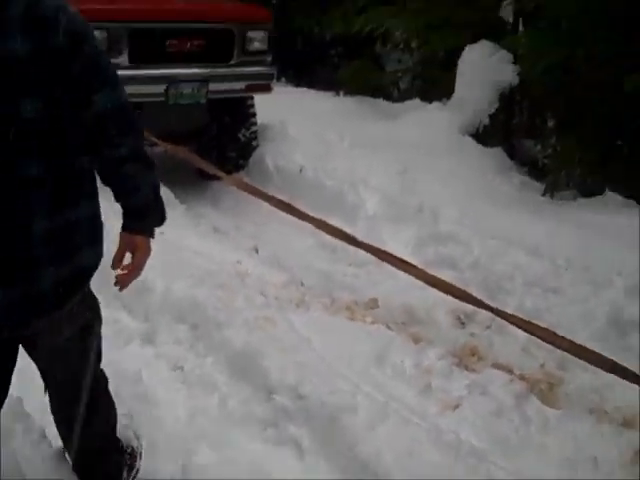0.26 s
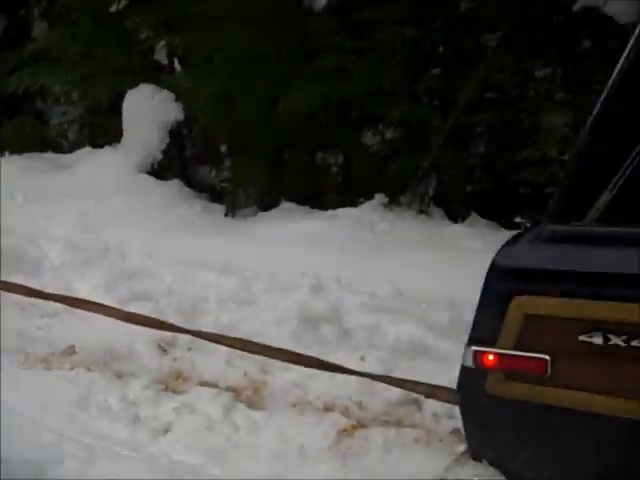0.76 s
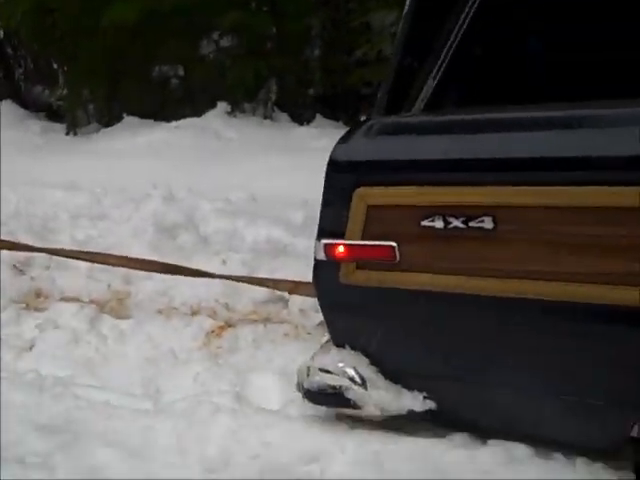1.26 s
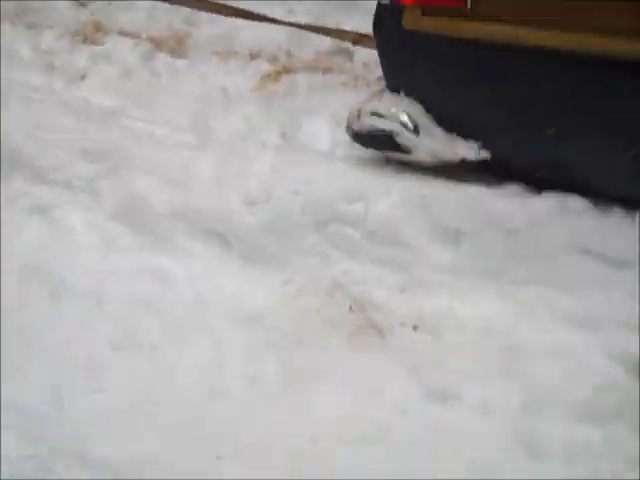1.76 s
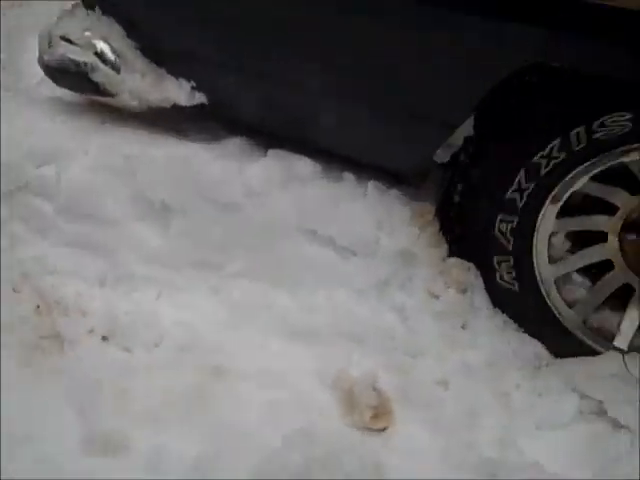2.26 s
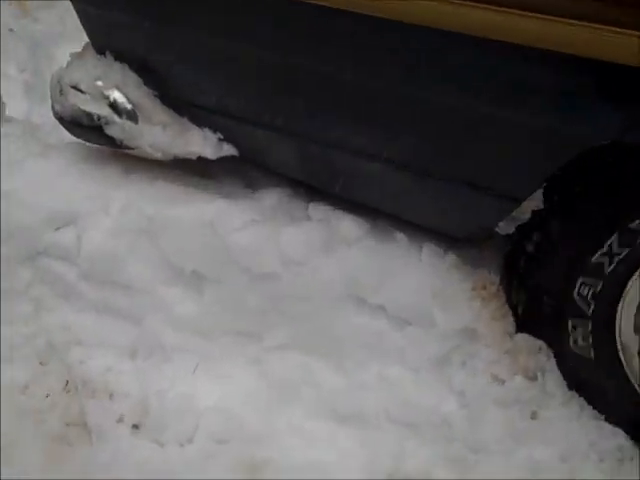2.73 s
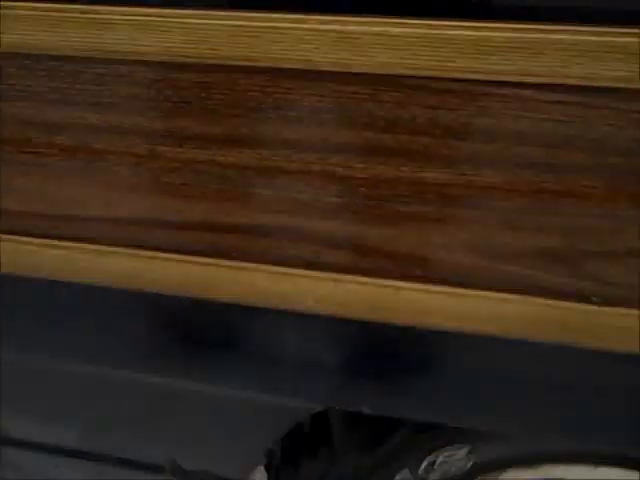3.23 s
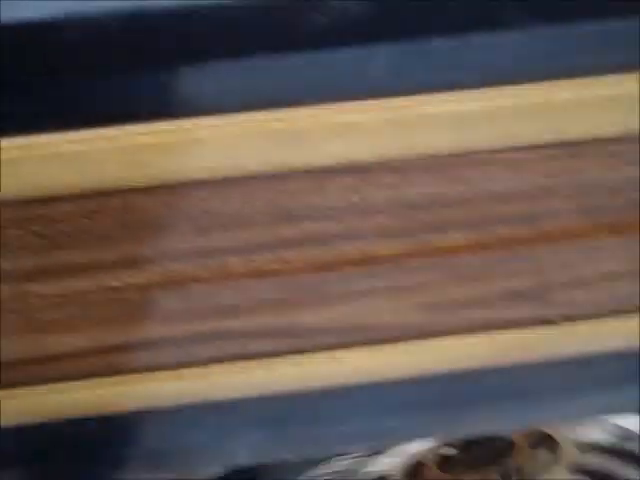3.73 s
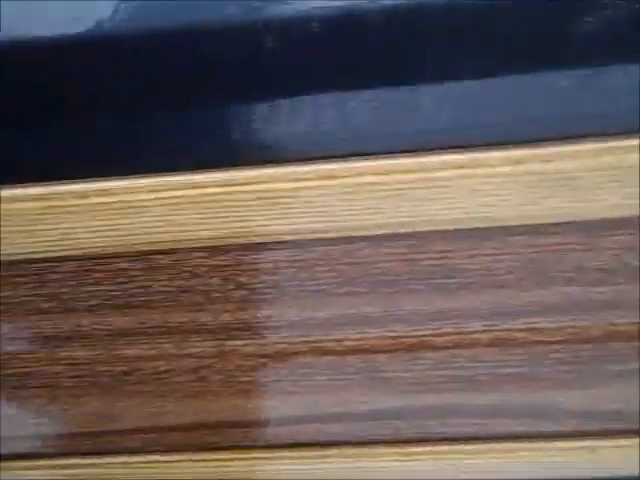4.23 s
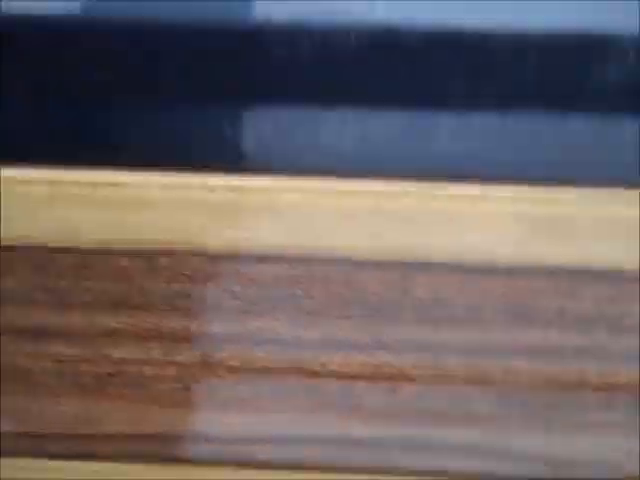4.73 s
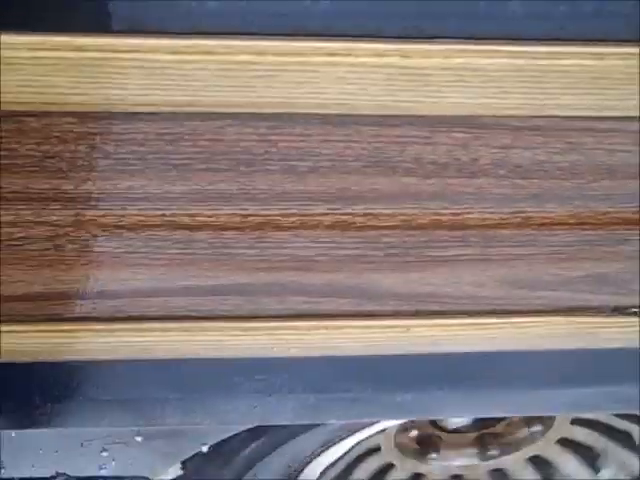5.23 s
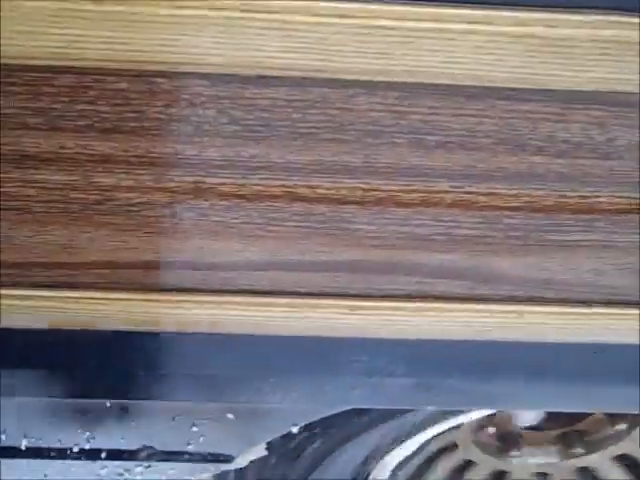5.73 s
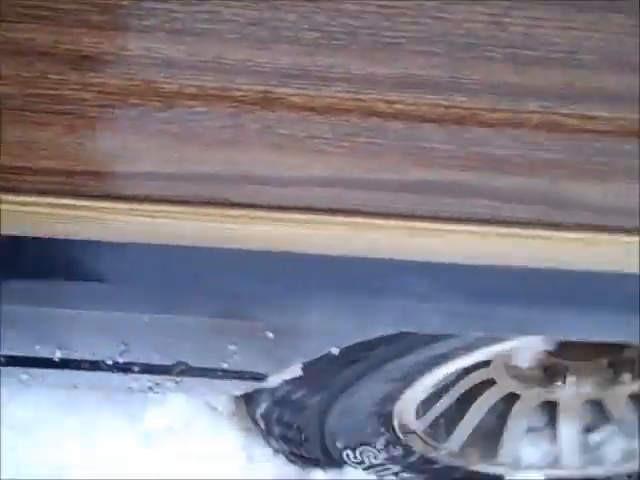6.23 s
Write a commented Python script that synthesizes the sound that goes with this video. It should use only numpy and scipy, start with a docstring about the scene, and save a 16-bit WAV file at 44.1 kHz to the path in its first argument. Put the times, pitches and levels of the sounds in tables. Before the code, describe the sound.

A V8 engine burbles loudly and steadily under load, with a tyre hissing and crunching in snow and the sound dipping abruptly several times.

```python
"""V8 off-roader stuck in snow

The engine strains at about 1250 rpm while the vehicle is towed out, heard from beside its rear wheel.
Uneven firings of the two cylinder banks burble through the muffler, over exhaust rush, engine clatter
and a tyre slipping and crunching in snow. Now and then the whole sound drops abruptly and swells back."""
import sys
import numpy as np
from scipy import signal
from scipy.fft import rfft, irfft, next_fast_len
from scipy.io import wavfile
from scipy.ndimage import uniform_filter1d, minimum_filter1d

SR = 44100
rng = np.random.default_rng(int(sys.argv[2]) if len(sys.argv) > 2 else 0)


def unload_audio(sound):
    """Save the sound as a 16-bit wav file, at the path given as the first command line argument."""
    columns = np.transpose(np.atleast_2d(sound))
    # keep every value between -1 and 1, then stretch to whole-number steps
    steps = np.round(np.clip(columns, -1, 1) * 32767)
    wavfile.write(sys.argv[1], SR, steps.astype(np.int16))


N = 286297
TIME = np.arange(N) / SR


def from_db(db):
    """Decibels to gain."""
    return 10 ** (np.asarray(db) / 20)


def rms_one(x):
    """Scale to unit power."""
    return x / np.sqrt(np.mean(x ** 2) + 1e-20)


def bell(away, spread):
    """A bell-shaped swell that peaks at 1 where away is zero."""
    return np.exp(-.5 * (away / spread) ** 2)


def drift(rate_hz):
    """A random wobble of unit power."""
    knots = rng.standard_normal(1024)
    return rms_one(np.interp(TIME * rate_hz, np.arange(len(knots)), knots))


def colour(x, points, channels=1):
    """Equalise by rows of Hz and dB, with one dB column or one per channel."""
    size = next_fast_len(N + 4096)
    log_hz = np.log(np.maximum(np.arange(size // 2 + 1) * SR / size, 1))
    hz, *columns = np.transpose(points)
    gains = from_db([np.interp(log_hz, np.log(hz), db) for db in columns[:channels]])
    return irfft(rfft(x, size) * gains, size)[..., :N]


def resonate(x, hz, width_hz):
    """One resonance with gain 1 at its peak."""
    r = np.exp(-np.pi * width_hz / SR)
    feedback = [1, -2 * r * np.cos(2 * np.pi * hz / SR), r * r]
    return signal.lfilter(np.array([1, 0, -1]) * (1 - r * r) / 2, feedback, x + 1e-18)


# Stereo image of the noise. Each row: frequency in Hz, left-right likeness from 0 (wide) to 1 (mono).
STEREO_LIKENESS = [(100, 1), (600, 0.8), (1300, 0.65), (2400, 0.49), (3600, 0.03), (5500, 0.55),
                   (8000, 0.04), (14000, 0)]


def stereo_noise(spectrum, grain_db):
    """Noise of uneven grains, centred in the bass and diffuse in the treble."""
    grains = from_db(grain_db * np.repeat(rng.standard_normal(N // 32 + 1), 32)[:N])
    mid, side = rng.standard_normal((2, N)) * grains
    hz, alike = np.transpose(STEREO_LIKENESS)
    alike = np.clip(alike, 0, .999)
    mid = colour(mid, np.c_[hz, 10 * np.log10(1 + alike)])
    side = colour(side, np.c_[hz, 10 * np.log10(1 - alike)])
    return rms_one(colour(mid + side * [[1], [-1]], spectrum))


def each_cycle(cycle, accents):
    """A gain that swells at set places in every engine cycle, never quite equally."""
    power = 1
    for place, spread, db in accents:
        away = (cycle - place + .5) % 1 - .5
        power = power + from_db(db + drift(21.04)) ** 2 * bell(away, spread)
    return rms_one(np.sqrt(power))


# Dull knocks. Each row: start in seconds, level in dB, lowest mode in Hz.
KNOCK_HITS = [(3.686, -29.5, 880), (5.047, -22.5, 640)]
# Their upper modes. Each row: pitch in Hz, width in Hz, gain in dB against the lowest mode.
KNOCK_UPPER_MODES = [(1029.2, 361, -14), (1560, 490, -13)]


def knocks(decay_s, width_hz):
    """Short soft blows ring a few damped modes."""
    soften = signal.butter(4, 1600, fs=SR, output="sos")
    out = 0
    for start, db, low_hz in KNOCK_HITS:
        blow = signal.sosfilt(soften, rng.standard_normal(N))
        modes = [(low_hz, width_hz, 0)] + KNOCK_UPPER_MODES
        ring = sum(from_db(mode_db) * resonate(blow, hz, width) for hz, width, mode_db in modes)
        envelope = (TIME > start) * np.exp(-np.abs(TIME - start) / decay_s)
        out = out + from_db(db) * envelope * rms_one(ring)
    return out


# Squeaks under the rubber. Each row: peak time in seconds, level in dB, pitch in Hz.
SNOW_SQUEAKS = [(1.07, -49, 6044), (1.56, -43.5, 6000), (2.25, -47, 6160), (3.225, -47.5, 5460),
                (4.93, -55, 7220), (5.6, -42, 7293)]


def snow_squeaks(spread_s, width_hz):
    """Packed snow sticks and slips in brief, narrow-band chirps."""
    out = 0
    for peak_s, db, hz in SNOW_SQUEAKS:
        ring = rms_one(resonate(rng.standard_normal(N), hz, width_hz))
        out = out + from_db(db) * bell(TIME - peak_s, spread_s) * ring
    return out


# Bites of the tread. Each row: peak time in seconds, half length in seconds, relative level in dB.
TREAD_BITES = [(2.72, .03, -44), (3.3, .025, -38.5), (3.79, .012, -40), (4.165, .012, -41),
               (4.207, .02, -35), (4.32, .035, -42), (4.563, .014, -39), (4.937, .016, -39),
               (5.365, .008, -42), (5.99, .012, -44), (6.16, .012, -44)]
# Their bright tone. Each row: frequency in Hz, relative level in dB.
CRUNCH_SPECTRUM = [(400, -5), (1200, 1.5), (2800, 2.5), (4000, 1.5), (7000, 2.5), (10000, -0.5),
                   (14000, 2.5)]


def snow_crunches():
    """The tread breaks snow loose in bursts of coarse grains."""
    bursts = sum(from_db(db) * bell(TIME - peak_s, spread_s) for peak_s, spread_s, db in TREAD_BITES)
    return from_db(2) * bursts * stereo_noise(CRUNCH_SPECTRUM, grain_db=4.5)


# Hiss fader as the wheel slips and comes closer. Each row: time in seconds, level in dB.
HISS_LEVEL = [(0, -42.5), (.3, -45.5), (.75, -46), (2.0, -42.5), (2.3, -44.5), (2.8, -42), (3.65, -45),
              (4.2, -41.5), (5.8, -42), (6.49, -43.5)]
# The tone of the hiss. Each row: frequency in Hz, relative level in dB.
HISS_SPECTRUM = [(2000, -30), (3600, -11), (4700, -6.5), (6000, 1), (8000, 0.5), (10000, -8.5), (14000, -2)]
# Its throbs. Each row: place in the engine cycle from 0 to 1, half length in cycles, dB over the hiss.
HISS_ACCENTS = [(.2, 0.013, 3), (.594, 0.031, 1)]


def tyre_hiss(cycle):
    """The tyre slips on snow with a flickering hiss that throbs in time with the engine."""
    level_db = np.interp(TIME, *np.transpose(HISS_LEVEL)) + 1.84 * drift(35)
    return from_db(level_db) * stereo_noise(HISS_SPECTRUM, grain_db=1.5) * each_cycle(cycle, HISS_ACCENTS)


# The tone of the clatter. Each row: frequency in Hz, relative level in dB.
CLATTER_SPECTRUM = [(700, -20), (1200, 0.5), (1800, 2), (2500, -3), (3500, -2), (4500, 0), (7000, -21.5),
                    (14000, -19.5)]
# Valve ticks. Each row: place in the engine cycle from 0 to 1, half length in cycles, dB over the clatter.
VALVE_ACCENTS = [(0.9, 0.0024, 7), (0.726, 0.0035, 8.5)]


def engine_clatter(cycle):
    """Mechanical noise with two sharp ticks of the valve gear in every cycle."""
    return stereo_noise(CLATTER_SPECTRUM, grain_db=-0.6) * each_cycle(cycle, VALVE_ACCENTS)


def rasp(cycle, morph_rad_per_s, size=2048):
    """A ragged pressure shape repeats every cycle and slowly morphs: a comb of engine orders."""
    shapes = rng.standard_normal((2, size))
    first, second = [np.interp(cycle, np.arange(size) / size, shape, period=1) for shape in shapes]
    turn = morph_rad_per_s * TIME
    return rms_one(first * np.cos(turn) + second * np.sin(turn))


# Hollow tones that come and go in the rush.
# Each row: start in seconds, end in seconds, pitch in Hz, width in Hz, level in dB.
HOLLOW_TONES = [(0.08, 1.3, 273, 36, -34.5), (0, 1.2, 330, 70, -38.5), (0, 1.73, 710, 160, -47),
                (1.12, 1.29, 647, 140, -40), (0.5, 1.68, 1840, 680, -53), (2.5, 2.895, 2160, 875, -52.5),
                (1.7, 2.31, 890, 240, -45), (2.5, 2.82, 1050, 200, -46), (3.5, 6.61, 560, 26, -44),
                (4, 6.52, 430, 98, -43), (2.5, 6.51, 2840, 900, -55.5)]


def hollow_tones(cycle, fade_s):
    """Engine orders and air slide through resonances, each heard for part of the way along the body."""
    drive = rasp(cycle, morph_rad_per_s=1.176) + rng.standard_normal(N)
    out = 0
    for start, end, hz, width, db in HOLLOW_TONES:
        fade = np.clip(np.minimum(TIME - start, end - TIME) / fade_s + .5, 0, 1)
        ring = resonate(resonate(drive, hz, width), hz, width)
        out = out + from_db(db) * fade * rms_one(ring)
    return out


# The breathy midrange of the tailpipe. Each row: frequency in Hz, relative level in dB.
RUSH_SPECTRUM = [(150, -9.5), (240, 6), (330, -0.5), (480, 0), (650, -3.5), (850, -3), (1000, -9.5),
                 (1200, -19.5), (1800, -31)]


def exhaust_rush(pressure, cycle, rasp_db, puff_db, flutter_db):
    """Gas leaves the tailpipe in puffs that follow the pressure, part rasp and part turbulence."""
    per_cycle = rasp(cycle, morph_rad_per_s=1.494)
    per_firing_pair = rasp(4 * cycle, morph_rad_per_s=5)
    orders = from_db(rasp_db) * rms_one(colour(per_cycle + 2 * per_firing_pair, RUSH_SPECTRUM))
    turbulence = stereo_noise(RUSH_SPECTRUM, grain_db=2.5) * from_db(flutter_db * drift(110))
    return rms_one((orders + turbulence) * from_db(puff_db * pressure))


# The low end of the exhaust noise. Each row: frequency in Hz, relative level in dB.
RUMBLE_SPECTRUM = [(15, -16), (32, 3), (48, 7.5), (66, -6.5), (110, 8), (170, -3.5), (220, -5), (300, -33),
                   (500, -53)]


def exhaust_rumble():
    """A bed of rough bass noise under the exhaust note."""
    return stereo_noise(RUMBLE_SPECTRUM, grain_db=4)


# The lope of the V8. Each entry: one cylinder's relative strength in dB, in firing order.
CYLINDER_STRENGTH_DB = [4.5, 2.5, -1.5, 3.5, 5, 0.24, 5, -2]
# The two banks, in the same order. Each entry: 1 for a far-bank cylinder, 0 for a near one.
ON_FAR_BANK = [0, 0, 1, 0, 1, 1, 0, 1]
FAR_BANK_LAG_S, FIRING_OFFSET_CYCLES = 0.0022, -0.03


def firings(cycle, uneven_db, jitter_s):
    """One pressure pulse per cylinder, eight to a cycle of two crank turns."""
    number = np.arange(1, 640)
    cylinder = number % 8
    timing_scatter, level_scatter = rng.standard_normal((len(number), 2)).T
    fired_s = np.interp(number / 8 + FIRING_OFFSET_CYCLES, cycle, TIME, right=2 * TIME[-1])
    # the far bank has the longer pipe, so its pulses arrive late
    arrival_s = fired_s + FAR_BANK_LAG_S * np.array(ON_FAR_BANK)[cylinder] + jitter_s * timing_scatter
    strength = from_db(np.array(CYLINDER_STRENGTH_DB)[cylinder] + uneven_db * level_scatter)
    return np.bincount(np.abs(arrival_s * SR).astype(int), strength, N)[:N]


# Resonances of the pipe and muffler. Each row: pitch in Hz, width in Hz, relative level in dB.
PIPE_MODES = [(53.6, 12.9, -7), (79.5, 23.3, -8.5), (109.8, 19.1, -1), (134.76, 21.1, -5),
              (156.1, 14.14, 0), (202.7, 37, -17.5)]


def exhaust_note(pulses, cycle, muffler_hz, low_cut_hz):
    """The firing pulses ring the pipe, and the muffler lets only the bass out."""
    first_cycle = pulses[cycle < 1]
    pulses = np.r_[first_cycle, first_cycle, pulses]  # pre-roll, so the pipe is already ringing
    ring = sum((-1) ** (k + 1) * from_db(db) * resonate(pulses, hz, width)
               for k, (hz, width, db) in enumerate(PIPE_MODES))
    muffled = signal.sosfilt(signal.butter(8, muffler_hz, fs=SR, output="sos"), ring)
    note = signal.sosfilt(signal.butter(1, low_cut_hz, "high", fs=SR, output="sos"), muffled)
    return rms_one(note[-N:])


def draw_alongside(note, thin_db, alongside_s):
    """The note's deepest bass starts thin and fills in as the vehicle comes alongside."""
    deep = colour(note, [(88, 0), (106, -40)])
    deep_gain = from_db(thin_db * np.clip(1 - TIME / alongside_s, 0, 1))
    return note + (deep_gain - 1) * deep


# The wavering revs. Each row: time in seconds, engine speed in rpm.
ENGINE_SPEED = [(0.0, 1307.4), (0.19, 1265), (0.52, 1240), (1.06, 1273), (1.25, 1219), (1.57, 1204),
                (1.83, 1278), (2.3, 1267.0), (2.35, 1302), (2.82, 1232), (2.93, 1216), (3.96, 1275),
                (4.24, 1283), (5.28, 1271), (5.6, 1215), (5.76, 1274), (6.1, 1270), (6.49, 1236)]
# The engine's mix at working speed; all four layers grow a little louder as it revs.
NOTE_DB, RUMBLE_DB, RUSH_DB, CLATTER_DB = -11, -24, -34.5, -44
WORKING_RPM, LOUDER_DB_PER_RPM = 1260, .011
# As the vehicle is drawn past, the rush gains and the clatter fades.
RUSH_GAIN_DB_PER_S, CLATTER_FADE_DB_PER_S = 0.2554, 0.77


def scene():
    """Exhaust, engine and tyre, all close by in the open air."""
    rpm = np.interp(TIME, *np.transpose(ENGINE_SPEED))
    cycle = np.cumsum(rpm) / (120 * SR)  # engine cycles so far, two crank turns each
    effort_db = LOUDER_DB_PER_RPM * (rpm - WORKING_RPM)
    rush_db = RUSH_DB + effort_db + RUSH_GAIN_DB_PER_S * TIME
    clatter_db = CLATTER_DB + effort_db - CLATTER_FADE_DB_PER_S * TIME
    pulses = firings(cycle, uneven_db=.7, jitter_s=.00012)
    note = exhaust_note(pulses, cycle, muffler_hz=175, low_cut_hz=22)
    burble = from_db(NOTE_DB) * draw_alongside(note, thin_db=-4, alongside_s=2.4)
    exhaust = from_db(effort_db) * (burble + from_db(RUMBLE_DB) * exhaust_rumble())
    rush = from_db(rush_db) * exhaust_rush(note, cycle, rasp_db=5, puff_db=1.8, flutter_db=2.6)
    hollows = hollow_tones(cycle, fade_s=.2)
    clatter = from_db(clatter_db) * engine_clatter(cycle)
    snow = tyre_hiss(cycle) + snow_crunches() + snow_squeaks(spread_s=.005, width_hz=600)
    return exhaust + rush + hollows + clatter + snow + knocks(decay_s=.013, width_hz=110)


# Sudden ducks of the whole mix. Each row: start in seconds, depth in dB.
LEVEL_DIPS = [(0.175, 6.5), (0.647, 5), (1.316, 4.5), (1.619, 10), (2.286, 11.5), (2.85, 4.5), (3.049, 12),
              (3.723, 7), (4.568, 7), (4.759, 5.5), (4.951, 14.5), (6.185, 7.5), (6.47, 8)]


def level_dips(fall_s, hold_s, recovery_db_per_s, opening_db):
    """The level falls within milliseconds, stays down briefly and climbs back evenly in dB."""
    # the opening is a little louder, and the first dip takes that away for good
    gain_db = opening_db * np.clip((LEVEL_DIPS[0][0] - TIME) / fall_s + .5, 0, 1)
    for start, depth_db in LEVEL_DIPS:
        fall = np.clip((TIME - start) / fall_s + .5, 0, 1)
        recovered_db = recovery_db_per_s * np.maximum(TIME - start - hold_s, 0)
        gain_db = gain_db - fall * np.maximum(depth_db - recovered_db, 0)
    return from_db(gain_db)


def limiter(x, ceiling, size=882):
    """The gain gives way smoothly around any peak that would overload."""
    safe_gain = np.minimum(1, ceiling / (np.abs(x).max(axis=0) + 1e-9))
    return x * uniform_filter1d(minimum_filter1d(safe_gain, size), size)


# Bass roll-off of the microphone capsules. Each entry: corner in Hz, left then right.
CAPSULE_LOW_CUT_HZ = [82.7, 27.8]
# Resonances of the microphone ports. Each row: frequency in Hz, left gain in dB, right gain in dB.
PORT_EQ = [(300, 0.23, -0.22), (4440, 0, 0), (5140, 3.5, 5.5), (5920, 3.5, 9), (6780, 8.5, 2),
           (7370, 11, -7.5), (8090, 3.5, -7.5), (9530, 0.5, -9), (13900, -9, -24)]
TOP_CUT_HZ = 14300


def record(dry):
    """The microphone thins the bass and colours the treble; then level dips, a limiter and a top cut."""
    thinned = [signal.lfilter(*signal.butter(1, hz, "high", fs=SR), side)
               for hz, side in zip(CAPSULE_LOW_CUT_HZ, dry)]
    coloured = colour(np.array(thinned), PORT_EQ, channels=2)
    ducked = coloured * level_dips(fall_s=.006, hold_s=.051, recovery_db_per_s=54, opening_db=1.7)
    top_cut = signal.ellip(12, .1, 90, TOP_CUT_HZ, fs=SR, output="sos")
    return signal.sosfilt(top_cut, limiter(ducked, ceiling=.92))


dry = scene()
out = record(dry)
unload_audio(out)
```